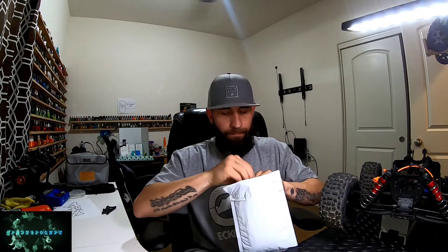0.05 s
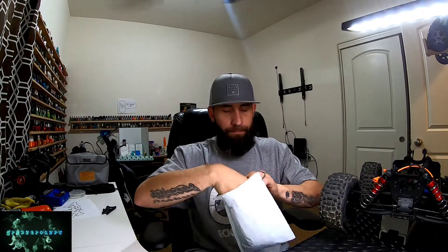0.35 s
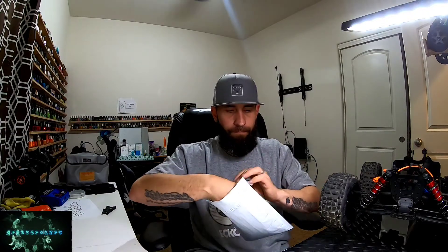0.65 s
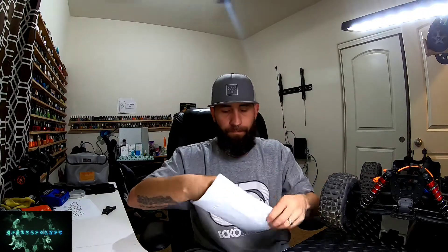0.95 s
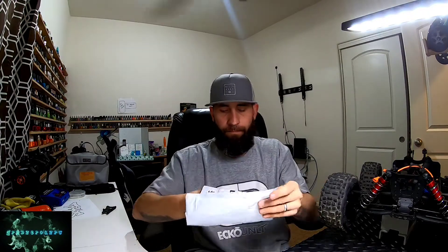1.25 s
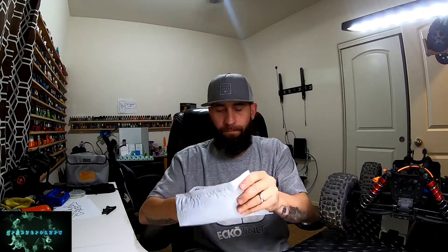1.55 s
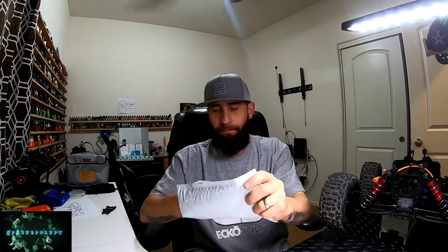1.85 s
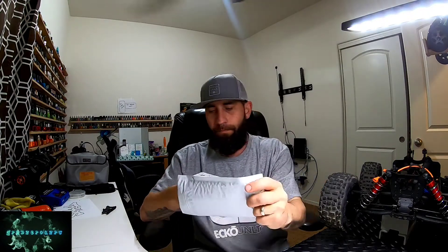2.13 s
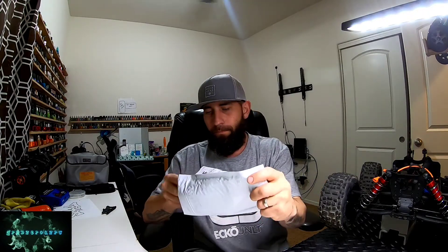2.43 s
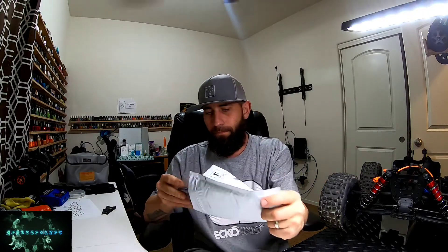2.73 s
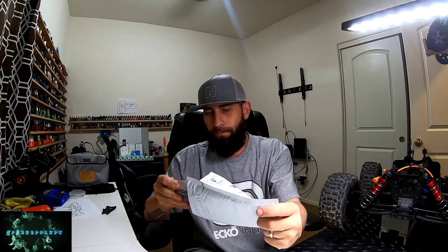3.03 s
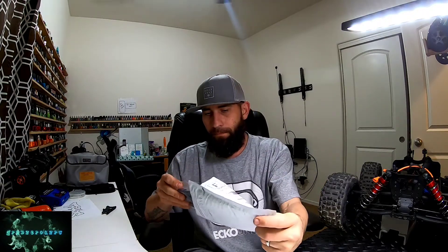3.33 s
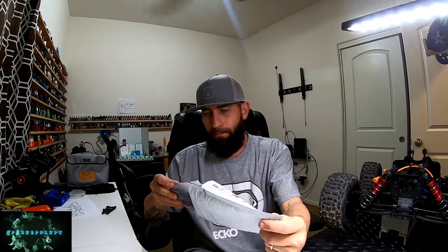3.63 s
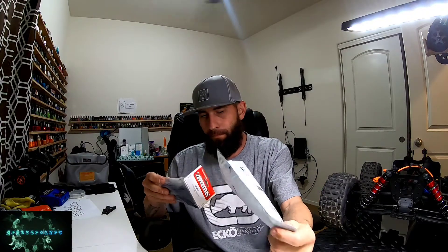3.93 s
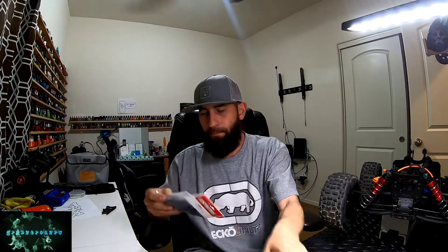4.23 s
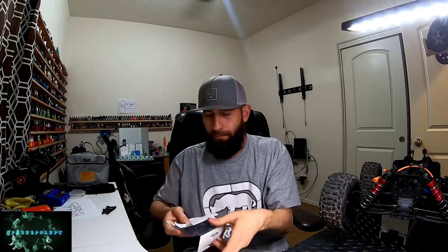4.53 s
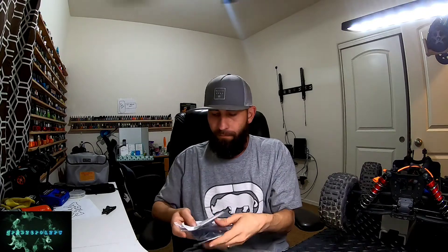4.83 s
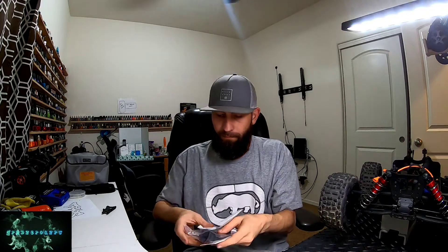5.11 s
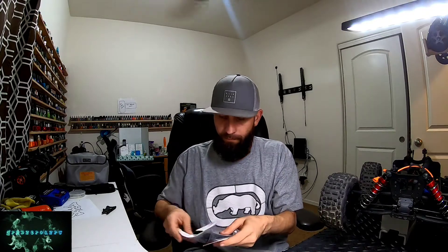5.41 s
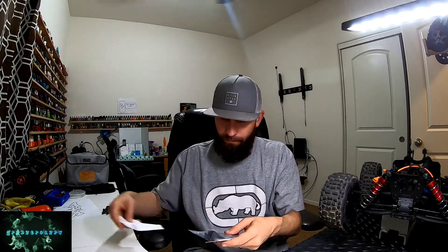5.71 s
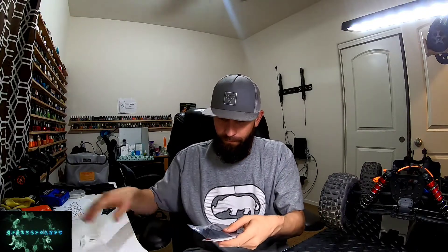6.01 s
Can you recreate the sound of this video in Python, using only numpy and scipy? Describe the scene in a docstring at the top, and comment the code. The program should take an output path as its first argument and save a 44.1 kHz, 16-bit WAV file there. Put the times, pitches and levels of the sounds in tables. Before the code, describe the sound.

A plastic mailer crinkles, snaps and pops as it is opened by hand, then a small plastic bag rustles crisply in a small room.

```python
"""A plastic mailer is pulled open at a desk in a small room.
First its film creases in tiny crackles and buckles in single snaps, while hands bump the hollow envelope.
From about 1 to 4 seconds, whole panels of it also pop through now and then.
From 4.6 seconds a little parts bag is slid out and fingered, and the snaps turn crisper.
All along, the walls give a short echo over a faint room hum."""
import sys
import numpy as np
from scipy import signal
from scipy.fft import rfft, irfft, next_fast_len
from scipy.io import wavfile
from scipy.ndimage import map_coordinates

SR = 44100
rng = np.random.default_rng(int(sys.argv[2]) if len(sys.argv) > 2 else 0)


def master(y):
    """Save y as 16-bit WAV."""
    cut = np.clip(np.atleast_2d(y).T, -1, 1)
    pcm = np.round(cut * 32767)  # scale
    wavfile.write(sys.argv[1], SR, pcm.astype(np.int16))


N = 267246

# Levels in dB are relative. A fade time (t60) is how long a sound takes to drop by 60 dB.
# The film buckling. Each row: start in seconds, level in dB, pitch in Hz, fade time in seconds.
SNAP_EVENTS = [(0.0583, -43.5, 2550, 0.018), (0.133, -40.5, 2600, 0.013), (0.2227, -41.5, 5440, 0.036),
               (0.4584, -31.5, 4480, 0.051), (0.616, -37, 1330, 0.025), (0.649, -34.5, 3000, 0.013),
               (0.662, -53, 3300, .012), (0.677, -43, 2380, 0.014), (0.727, -32, 2480, 0.018),
               (0.7627, -26, 2380, 0.011), (0.776, -33, 2480, 0.017), (0.828, -34, 2850, 0.013),
               (0.877, -36, 2430, 0.015), (0.9181, -27, 2450, 0.0095), (0.954, -31, 2600, 0.034),
               (1.053, -30.5, 2390, 0.0076), (1.077, -32, 2440, 0.01), (1.103, -31, 3500, .012),
               (1.1303, -28.5, 950, 0.025), (1.1643, -21.5, 3400, 0.04), (1.248, -32.5, 2500, 0.03),
               (1.295, -28.5, 2800, 0.029), (1.324, -38, 1850, 0.017), (1.3953, -29, 1310, 0.044),
               (1.448, -41, 2120, 0.0061), (1.496, -34, 2540, 0.013), (1.517, -28.5, 2250, 0.03),
               (1.543, -25.5, 2100, 0.056), (1.5718, -23, 2560, 0.014), (1.641, -30.5, 3260, 0.013),
               (1.658, -35, 3200, 0.023), (1.679, -31, 6000, 0.013), (1.69, -30.5, 3600, 0.01),
               (1.722, -34.5, 2420, 0.011), (1.7979, -28, 2580, 0.011), (1.804, -27, 2700, 0.014),
               (1.814, -32, 2000, 0.017), (1.847, -36, 1900, .012), (1.8875, -28.5, 2230, 0.012),
               (1.895, -29.5, 1600, 0.016), (1.9365, -30.5, 2160, 0.01), (1.9805, -36, 5500, 0.0082),
               (2.0018, -23, 2420, 0.015), (2.024, -23, 2650, 0.02), (2.096, -27.5, 1910, .02),
               (2.165, -27, 2780, 0.035), (2.2644, -32, 1830, 0.012), (2.273, -32, 4620, 0.0047),
               (2.2805, -31, 2270, 0.014), (2.291, -28.5, 2700, .014), (2.318, -35, 2760, 0.013),
               (2.337, -35, 3400, 0.0092), (2.371, -39, 2800, 0.021), (2.41, -35, 1510, .09),
               (2.4378, -26, 1800, 0.012), (2.4638, -24, 2020, 0.02), (2.5205, -35, 2600, 0.0094),
               (2.571, -45, 3460, 0.007), (2.6603, -23.5, 6030, 0.011), (2.7065, -27.5, 5030, 0.014),
               (2.714, -56, 2000, 0.013), (2.78, -35, 4200, 0.018), (2.8085, -28.5, 1690, 0.036),
               (2.822, -36, 2050, 0.026), (2.8555, -30, 1310, 0.048), (2.9586, -32.5, 3870, 0.045),
               (2.9899, -30, 2000, 0.03), (3.1341, -35.5, 1570, 0.028), (3.235, -33.5, 5070, .01),
               (3.2675, -32, 2700, 0.018), (3.2778, -23, 5700, 0.0092), (3.406, -33, 2770, 0.047),
               (3.413, -33, 3040, 0.012), (3.5625, -23.5, 4200, 0.009), (3.646, -42, 2800, .025),
               (3.655, -36, 5000, .01), (3.757, -37, 2700, 0.011), (3.77, -25.5, 2600, 0.0064),
               (3.8568, -34, 1830, 0.011), (3.8921, -34, 3570, 0.025), (4.072, -42.5, 2650, 0.016),
               (4.113, -43, 3930, .012), (4.1902, -33.5, 5840, 0.018), (4.2955, -28.5, 2670, 0.026),
               (4.318, -41, 2290, .02), (4.342, -33.5, 2370, 0.018), (4.3602, -29.5, 3960, 0.047),
               (4.388, -38, 2580, .03), (4.4748, -33.5, 2460, 0.017), (4.492, -42, 3800, .012),
               (4.5145, -33.5, 2420, 0.015), (4.5245, -30, 3400, 0.03), (4.534, -30.5, 1500, 0.021),
               (4.6352, -34.5, 2900, 0.031), (4.6506, -37, 4200, 0.035), (4.7075, -38, 3600, 0.01),
               (4.9594, -31, 1880, 0.052), (5.0072, -29.5, 1510, .012), (5.039, -29, 2740, 0.015),
               (5.0478, -29, 2530, 0.016), (5.0962, -30.5, 2520, 0.0092), (5.125, -24.5, 2210, 0.028),
               (5.2037, -35, 2490, 0.033), (5.249, -22, 3150, 0.07), (5.272, -25, 2050, 0.026),
               (5.388, -47, 1380, 0.017), (5.406, -22, 5300, 0.02), (5.4311, -25.5, 5170, 0.03),
               (5.5943, -39, 2580, 0.025), (5.649, -22, 6860, 0.013), (5.899, -47.5, 1840, 0.071),
               (6.019, -53.5, 1270, .04)]
# Tone of a snap in the soft mailer and in the thinner bag. Each row: frequency in Hz, level in dB.
MAILER_TONE = [(200, -4.5), (430, 10.5), (620, -0.5), (1000, -2), (1500, 3), (2000, -1), (2600, 3.5),
               (5000, -1), (8000, 4.5), (10000, 0.5), (11500, -9.5), (15000, -14)]
BAG_TONE = [(430, 5), (620, -2), (1300, 5.5), (2500, 2.5), (5000, 4.5), (8500, 10), (11500, 1), (15500, -6)]
# The film rustles while it is held. Each row: time in seconds, level in dB.
HOLD_LEVELS = [(0, -52), (.14, -60), (.19, -67), (.28, -53.5), (.55, -46.5), (.82, -52), (.89, -56.5),
               (1.06, -44.5), (1.9, -46), (2.21, -51.5), (2.55, -49), (2.98, -53.5), (3.12, -66),
               (3.53, -66.5), (3.72, -50.5), (3.97, -60), (4.25, -62), (4.45, -60), (4.9, -61), (5.1, -52),
               (5.55, -56), (5.79, -73), (5.99, -114), (6.05, -62)]
# Hands squeezing. Each row: start and length in seconds, level in dB, hiss compared with crackle in dB.
HAND_SQUEEZES = [(0.325, 0.047, -56, 7), (0.441, 0.069, -43, -4), (0.713, 0.042, -46.5, -28),
                 (0.935, 0.025, -43.5, -22), (1.024, 0.065, -53, 6.5), (1.51, 0.028, -39.5, -1),
                 (1.578, 0.12, -46.5, 2), (1.823, 0.056, -43, -0.5), (2.016, 0.13, -40.5, -3.5),
                 (2.253, 0.026, -42, 0), (2.346, 0.049, -45, -1.5), (2.386, 0.11, -38, -3.5),
                 (2.663, 0.081, -36.5, -7), (2.767, 0.071, -45, 0), (3.086, 0.1, -56, -31),
                 (3.387, 0.013, -44.5, -4), (3.635, 0.043, -44.5, -1), (4.13, 0.15, -67, 13.5),
                 (4.278, 0.12, -50, -0.5), (4.49, 0.059, -45, -7.5), (4.937, .03, -48.5, -8),
                 (4.959, 0.11, -48, -0.5), (5.272, 0.047, -52.5, 7), (5.352, 0.058, -45, -4.5),
                 (5.386, 0.1, -44, 1), (5.632, 0.055, -56, 7.5), (5.879, 0.061, -70, 7)]
# Tone of the three parts of the rustle. Each row: frequency in Hz, level in dB.
CRACKLE_TONE = [(400, -65), (700, -31), (1000, 5.5), (1500, 3.5), (2000, 1.5), (2800, 6), (4000, -4),
                (5500, -2.5), (9000, -96)]
HISS_TONE = [(2000, -10.5), (4000, 6), (5200, 2.5), (7500, 6.5), (9500, 1.5), (11500, -8), (14000, -17),
             (16000, -45)]
FLUTTER_TONE = [(60, -68), (130, -16), (185, -3.5), (320, -10), (395, -6.5), (435, -2), (500, -11),
                (600, -16), (850, -13), (1500, -90)]
# Panels popping. Each row: start in seconds, level in dB, favoured pitch in Hz, spread in octaves.
POP_EVENTS = [(0.9188, -23, 2000, 0.41), (2.001, -20, 2020, 0.31), (2.6609, -15, 1470, 0.34),
              (2.7138, -15.5, 900, 0.68), (3.2778, -21.5, 1200, 0.9), (3.5625, -19.5, 4230, 1.08),
              (3.565, -22.5, 674, 0.27), (3.7697, -24, 330, 0.45)]
# The notes a panel rings with. Each row: pitch in Hz, level in dB, fade time in seconds.
PANEL_NOTES = [(190, -15.5, 0.24), (453, -6, 0.04), (910, -4, 0.023), (1275, -1.5, 0.012),
               (1520, 3.5, 0.0078), (2470, -5, 0.022), (2850, 5, 0.0056), (3840, -3.5, 0.0098),
               (5170, 12, 0.0051), (6470, 6, 0.0057)]
# Hand bumps. Each row: start in seconds, level in dB, pitch in Hz, fade time of the shudder in seconds.
BUMP_EVENTS = [(0.059, -47, 113, 0.15), (0.35, -47, 101.9, 0.4), (0.466, -36.5, 115, 0.19),
               (0.948, -44.5, 101, 0.093), (1.039, -44, 110, 0.092), (1.251, -40.5, 100, 0.027),
               (2.66, -50.5, 226, 0.28), (2.716, -54, 215, 0.12), (2.834, -45, 120, 0.1),
               (3.566, -39, 206, 0.71), (3.771, -37, 164, 0.19), (4.361, -35.5, 440, 0.08),
               (4.364, -32, 101, 0.21), (4.395, -39.5, 126, 0.24), (4.429, -46.5, 406, 0.037),
               (4.515, -37, 220, 0.15), (4.534, -42, 970, 0.15), (4.557, -42, 105, 0.084)]
# The echo of the walls. Each row: frequency in Hz, fade time in seconds.
WALL_FADES = [(150, 0.4), (430, 0.27), (700, 0.43), (1400, 0.29), (3700, 0.26), (10000, 0.2), (15000, 0.05)]
# Tone of the room hum. Each row: frequency in Hz, level in dB.
HUM_TONE = [(25, -35), (85, -22), (140, 0), (165, 0), (182, 6.5), (205, 2.5), (240, -3.5), (420, -12.5),
            (800, -21), (2000, -17), (8000, -31), (15000, -58)]
# Room hum plus the rumble of arms, clothes and chair moving. Each row: time in seconds, level in dB.
RUMBLE_LEVELS = [(0, -61.5), (3.3, -59), (4.1, -66), (4.7, -59), (5.75, -69), (6.05, -62)]
# How alike left and right are. Each row: frequency in Hz, likeness (1 is the same, 0 is unrelated).
STEREO_LIKENESS = [(100, 0.95), (300, 0.92), (600, 0.62), (2000, 0.36), (4500, 0.69), (8000, -0.24)]
# The lean to the right. Each row: frequency in Hz, left level minus right level in dB.
STEREO_LEAN = [(100, -.5), (250, -2.4), (500, -1.4), (1000, -4.7), (2000, -3), (4000, -2.7), (10000, -3.2)]

BAG_FROM_S = 4.6


def snaps(crack_db=-4, echo_db=-4, size=16384):
    """A crease flips over with a sharp crack, and the sheet around it gives a low flap."""
    out, hz = np.zeros((2, N)), np.fft.rfftfreq(size, 1 / SR)
    mailer, bag = amp(along(MAILER_TONE, hz)), amp(along(BAG_TONE, hz))
    sheet = hump(hz, centre_hz=483, octaves=0.82)
    for start, db, pitch_hz, t60 in SNAP_EVENTS:
        film = (mailer if start < BAG_FROM_S else bag) * amp(2 * facets(hz, [0])[:, 0])
        octaves = 0.77 * (pitch_hz / 3000) ** 0.32  # small, high facets crack over a wider band
        flap_db = -21.5 - 6.5 * np.log2(pitch_hz / 3000)  # big, low ones drag more sheet along
        crack = burst(film * hump(hz, pitch_hz, octaves), t60, span_s=.005, echo_db=echo_db)
        flap = burst(film * sheet, t60=.035, span_s=.005, echo_db=echo_db)
        add(out, start, amp(db) * (amp(crack_db) * crack + amp(flap_db) * flap))
    return out


def rustle(crackle_gain, hiss_gain, per_second=220, spread_db=7.5, crackle_db=-1.5, flutter_db=-8.5):
    """Every small crease gives a crackle, a bright tick of hiss and a low flutter."""
    starts = rng.integers(0, N, int(per_second * N / SR))
    sizes_db = spread_db * np.minimum(rng.exponential(size=len(starts)), 1.8)
    crackle = creases(starts, sizes_db, CRACKLE_TONE, t60=.011, rub=.2, facet_db=2.5)
    hiss = creases(starts, sizes_db, HISS_TONE, t60=.016, rub=.45, facet_db=1)
    flutter = creases(starts, sizes_db, FLUTTER_TONE, t60=.035, rub=.28, facet_db=6)
    return crackle_gain * (amp(crackle_db) * crackle + amp(flutter_db) * flutter) + hiss_gain * hiss


def creases(starts, sizes_db, tone, t60, rub, facet_db, shapes_per_second=20):
    """Tiny bursts of noise on top of smooth rubbing; their tone shifts as the film folds."""
    energy = amp(sizes_db + rng.uniform(-5, 5, len(starts))) ** 2
    kicks = np.bincount(starts, energy, N)
    power = signal.lfilter([1], [1, -amp(-60 / (t60 * SR)) ** 2], kicks)  # each kick dies away
    grains = rng.standard_normal((2, N)) * np.sqrt(power / power.mean() + rub)
    hz, t, spectrum = signal.stft(grains, SR, nperseg=512)
    spectrum *= amp(facet_db * facets(hz, t * shapes_per_second))
    grains = signal.istft(spectrum, SR, nperseg=512)[1][:, :N]
    return unit(filtered(grains, lambda hz: amp(along(tone, hz))))


def crinkles(per_second=170, typical_hz=2230, octaves=0.628, spread_db=2, fade_cycles=12, size=1024):
    """Little facets flip at random moments, each pinging briefly at its own pitch."""
    when, pitch, strength, *phases = rng.uniform(0, 1, (int(per_second * N / SR), 5)).T[..., None]
    hz = typical_hz * 2 ** (octaves * np.clip(np.log(pitch / (1 - pitch)) / 2, -2, 2))
    size_db = spread_db * np.minimum(-np.log(strength), 2)
    cycles = hz * np.arange(size) / SR
    envelope = amp(size_db - 60 * cycles / fade_cycles) * (1 - np.exp(-cycles))
    samples = ((when * N).astype(int) + np.arange(size)).ravel()
    pings = [envelope * np.sin(2 * np.pi * (cycles + phase)) for phase in phases]
    return unit(np.array([np.bincount(samples, channel.ravel(), N)[:N] for channel in pings]))


def handling():
    """How loud the crackle and the sliding hiss are: a light hold, plus a swell for each squeeze."""
    t = np.arange(N) / SR
    crackle = hiss = amp(np.interp(t, *np.transpose(HOLD_LEVELS))) ** 2
    for start, length, db, slide_db in HAND_SQUEEZES:
        swell = np.clip((t - start) / 0.012, 0, 1)
        release = np.exp(-np.maximum(t - start - length, 0) / 0.0059)
        power = (amp(db) * swell * release) ** 2
        crackle = crackle + power
        hiss = hiss + power * amp(slide_db) ** 2
    return np.sqrt(crackle), np.sqrt(hiss)


def facets(hz, shapes, per_octave=6):
    """The small flat faces of crumpled film favour random pitches, which change with its shape."""
    octave, shape = np.meshgrid(np.log2(hz + 20), shapes, indexing="ij")
    knots = rng.standard_normal((128, int(np.max(shapes)) + 2))
    return map_coordinates(knots, [octave * per_octave, shape], mode="mirror")


def pops(attack_s=.0003, echo_db=-9, size=8192):
    """A whole panel flips and rings briefly; how it is bent decides which of its notes sound."""
    out, t = np.zeros((2, N)), np.arange(size) / SR
    hz, note_db, t60 = np.transpose(PANEL_NOTES)[..., None]
    for start, db, pitch_hz, octaves in POP_EVENTS:
        share = np.exp(-(np.log2(hz / pitch_hz) / (2 * octaves)) ** 2)
        phase = np.array([np.zeros(hz.shape), rng.uniform(0, 1, hz.shape)])  # middle in step, side not
        notes = share * amp(note_db - 60 * t / t60) * np.sin(2 * np.pi * (hz * t + phase))
        ring = amp(db) * notes.sum(axis=1) * (1 - np.exp(-t / attack_s))
        add(out, start, ring)
        add(out, start, amp(echo_db) * signal.fftconvolve(ring, wall_tail(), axes=1))
    return out


def bumps(knock_db=-5.5, fade_cycles=3, shudder_db=-2, size=16384):
    """Hands push the air in the limp envelope: one short, dry knock, then a dull shudder."""
    out, hz = np.zeros((2, N)), np.fft.rfftfreq(size, 1 / SR) + 1
    for start, db, pitch_hz, t60 in BUMP_EVENTS:
        sharpness = .7 * (pitch_hz / 130) ** .4  # higher bumps ring more narrowly
        hollow = 1 / (1 + (sharpness * (hz / pitch_hz - pitch_hz / hz)) ** 2) / np.sqrt(hz)
        shudder = burst(hollow, t60, span_s=.006, echo_db=-11)
        cycles = pitch_hz * np.arange(size) / SR
        airflow = np.sin(2 * np.pi * cycles) * amp(-60 * cycles / fade_cycles) * (1 - np.exp(-2 * cycles))
        pressure = np.gradient(airflow)
        knock = np.outer([1, 0], pressure) * np.sqrt(.01 * SR) / np.linalg.norm(pressure)  # middle only
        add(out, start, amp(db) * (amp(knock_db) * knock + amp(shudder_db) * shudder))
    return out


def room_echo(x, stretches=20):
    """The walls answer each stretch of sound with a new echo, as the envelope moves about."""
    out = np.zeros((2, N))
    edges = np.linspace(0, N, stretches + 1).astype(int)
    for a, b in zip(edges, edges[1:]):
        add(out, a / SR, signal.fftconvolve(x[:, a:b], wall_tail(), axes=1))
    return out


def wall_tail(build_up_s=0.00091):
    """A new random echo of the walls, in which each frequency dies at its own speed."""
    hz, t, spectrum = signal.stft(rng.standard_normal((2, 16384)), SR, nperseg=256)
    fade = amp(-60 * t / along(WALL_FADES, hz)[:, None])
    tail = signal.istft(spectrum * fade, SR, nperseg=256)[1]
    tail *= 1 - np.exp(-np.arange(tail.shape[1]) / (SR * build_up_s))
    return unit(tail) / np.sqrt(tail.shape[1])


def room_hum():
    """Low room hum that swells and sinks with the rumble of arms, clothes and chair moving."""
    level_db = np.interp(np.arange(N) / SR, *np.transpose(RUMBLE_LEVELS))
    rumble = filtered(rng.standard_normal((2, N)), lambda hz: amp(along(HUM_TONE, hz)))
    return amp(level_db) * unit(rumble)


def burst(tone, t60, span_s, echo_db, attack_s=0.0005):
    """A dying puff of noise plus its echo; the puff has the energy of span_s seconds at level 1."""
    tail = wall_tail()
    t = np.arange(tail.shape[1]) / SR
    puff = rng.standard_normal(tail.shape) * amp(-60 * t / t60) * (1 - np.exp(-t / attack_s))
    shaped = shape_tone(np.array([puff, tail]), tone)
    direct, echo = shaped / np.linalg.norm(shaped, axis=-1, keepdims=True)
    return (direct + amp(echo_db) * echo) * np.sqrt(span_s * SR)


def stereo(pair):
    """Turn middle and side into left and right: alike in the bass, apart in the treble, leaning right."""
    def shares(hz):
        angle = np.arccos(np.clip(along(STEREO_LIKENESS, hz), -1, 1)) / 2
        return np.array([np.cos(angle), np.sin(angle)])
    middle, side = filtered(pair, shares)
    left_right = np.array([middle + side, middle - side])
    return filtered(left_right, lambda hz: amp(np.outer([.5, -.5], along(STEREO_LEAN, hz))))


def shape_tone(x, gain):
    """Change the tone of a short sound without any ringing ahead of it."""
    cepstrum = irfft(np.log(np.maximum(gain, 1e-6)))
    half = len(cepstrum) // 2
    cepstrum[1:half] *= 2
    cepstrum[half + 1:] = 0
    return irfft(rfft(x) * np.exp(rfft(cepstrum)))


def filtered(x, response):
    """Turn each frequency up or down by the gain that response gives it."""
    size = next_fast_len(N + SR // 2)
    return irfft(rfft(x, size) * response(np.fft.rfftfreq(size, 1 / SR)), size)[..., :N]


def hump(hz, centre_hz, octaves):
    """A broad, bell-shaped peak around one pitch."""
    return np.exp(-(np.log2((hz + 1) / centre_hz) / (2 * octaves)) ** 2) / np.sqrt(hz + 1)


def along(points, hz):
    """Read between the rows of a frequency table, with octaves evenly spaced."""
    row_hz, values = np.transpose(points)
    return np.interp(np.log(hz + 1), np.log(row_hz + 1), values)


def add(track, start_s, sound):
    """Mix a sound into a track."""
    part = track[:, round(start_s * SR):][:, :sound.shape[1]]
    part += sound[:, :part.shape[1]]


def amp(db):
    """Turn decibels into a gain."""
    return 10 ** (np.asarray(db) / 20)


def unit(x):
    """Scale to an average (rms) level of 1."""
    return x / np.sqrt(np.mean(x ** 2) + 1e-20)


def scene(crinkle_db=-4.5, echo_db=-4):
    """Mix the rustling film, its echo, the snaps, pops and bumps, and the hum."""
    crackle_gain, hiss_gain = handling()
    film = rustle(crackle_gain, hiss_gain) + crackle_gain * amp(crinkle_db) * crinkles()
    return stereo(film + amp(echo_db) * room_echo(film) + snaps() + pops() + bumps() + room_hum())


def record(dry, top_hz=15800):
    """Cut off the very highest treble."""
    return filtered(dry, lambda hz: hz < top_hz)


dry = scene()
out = record(dry)
master(out)
```